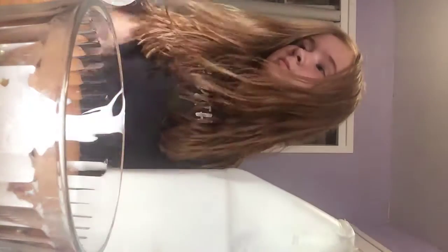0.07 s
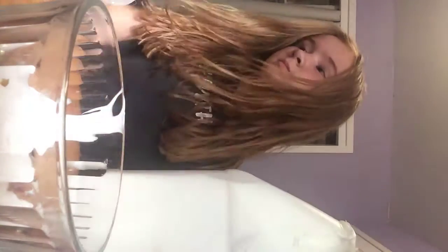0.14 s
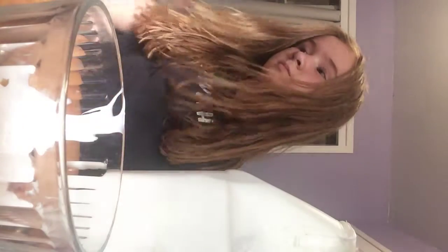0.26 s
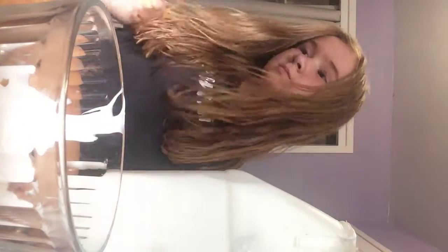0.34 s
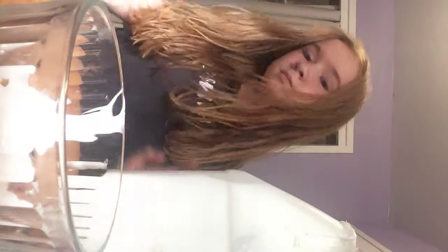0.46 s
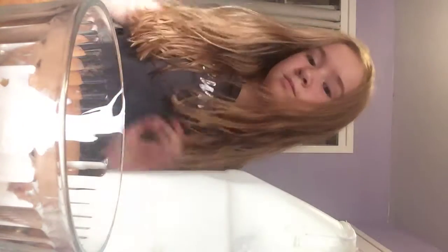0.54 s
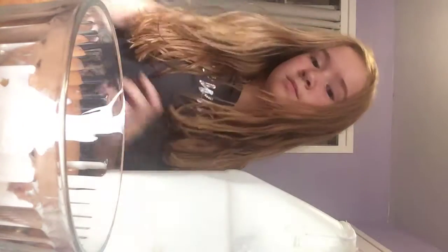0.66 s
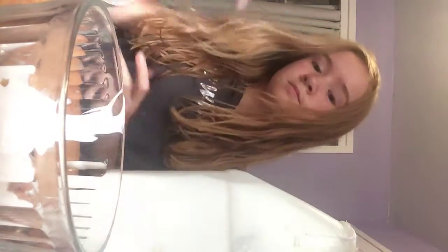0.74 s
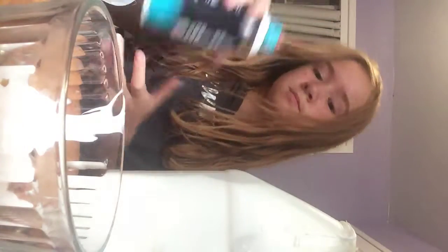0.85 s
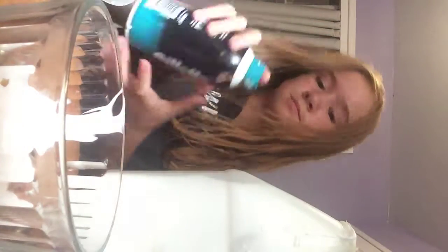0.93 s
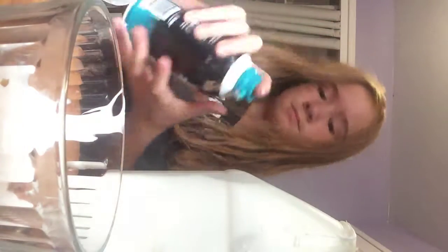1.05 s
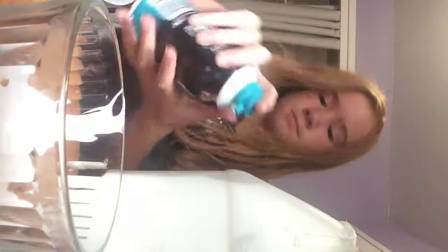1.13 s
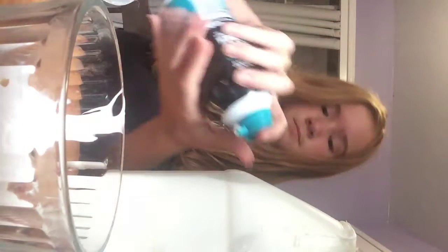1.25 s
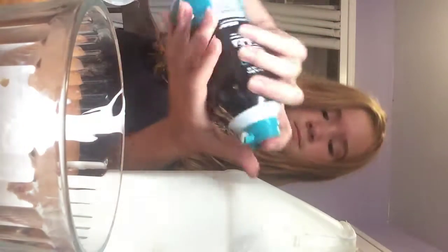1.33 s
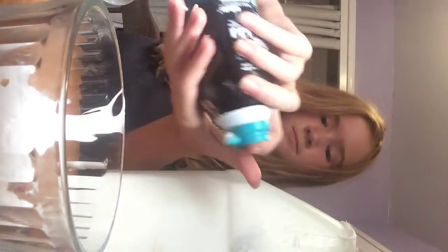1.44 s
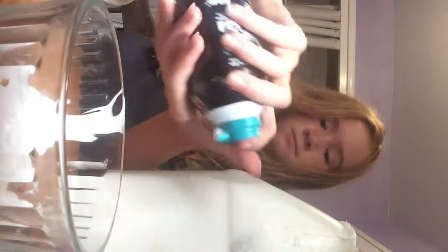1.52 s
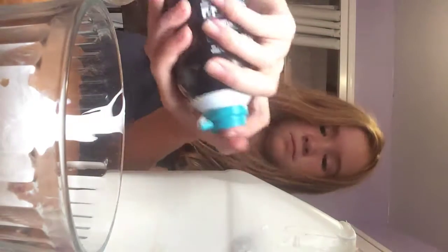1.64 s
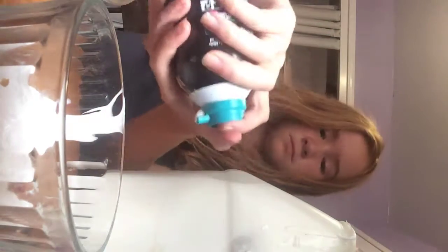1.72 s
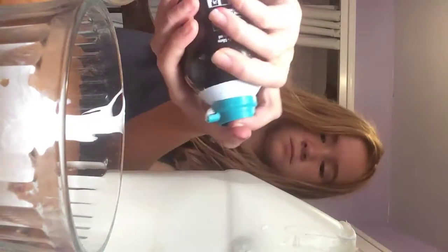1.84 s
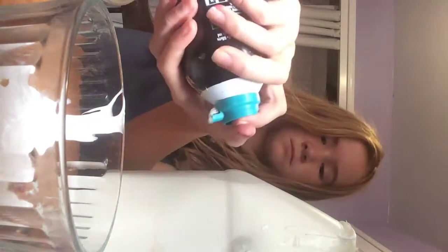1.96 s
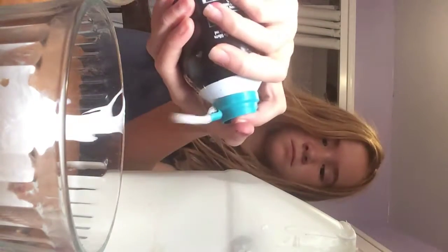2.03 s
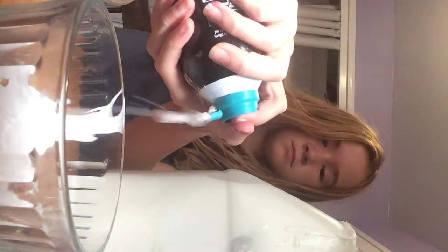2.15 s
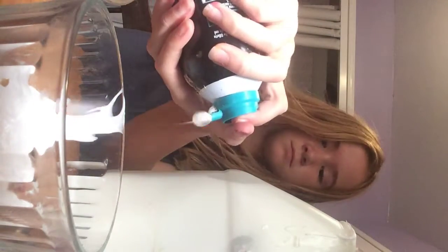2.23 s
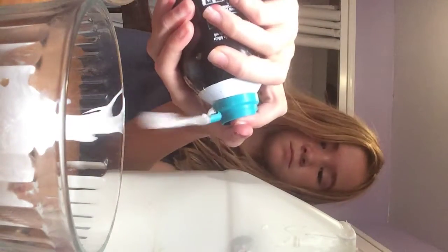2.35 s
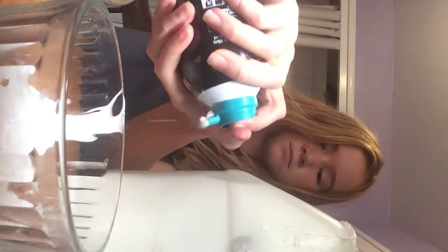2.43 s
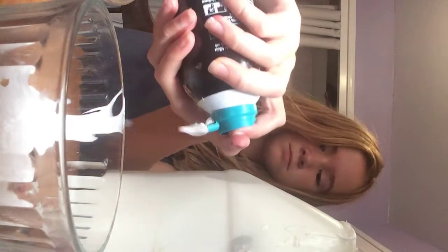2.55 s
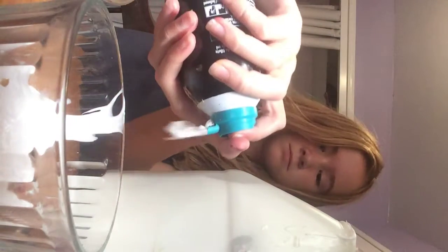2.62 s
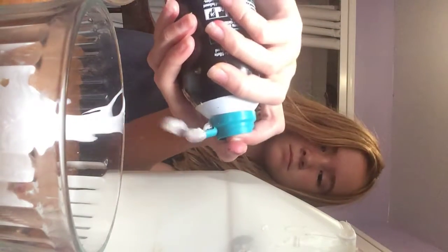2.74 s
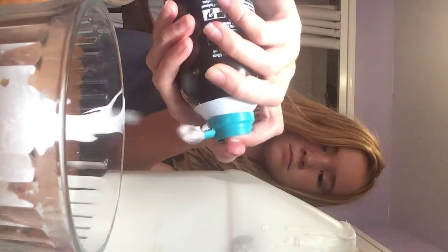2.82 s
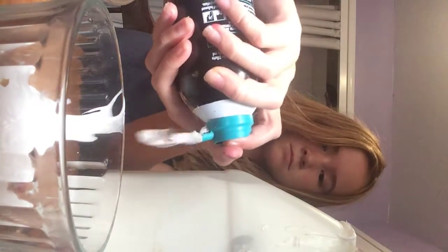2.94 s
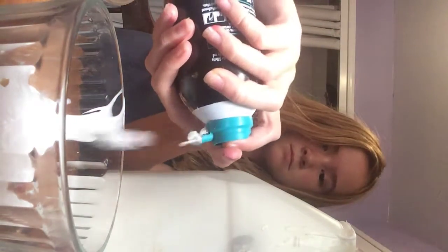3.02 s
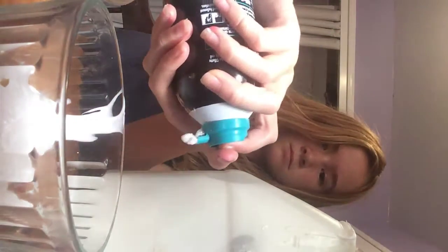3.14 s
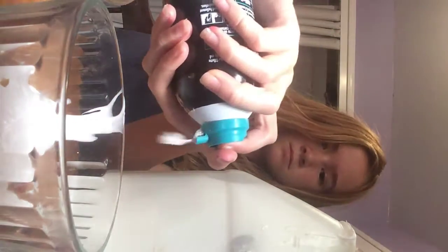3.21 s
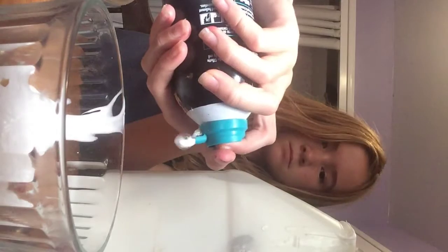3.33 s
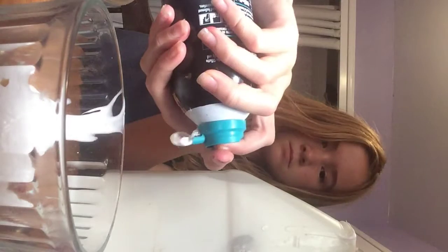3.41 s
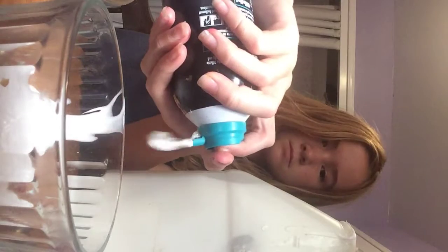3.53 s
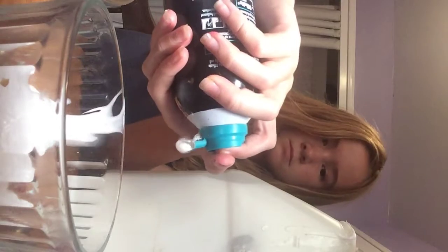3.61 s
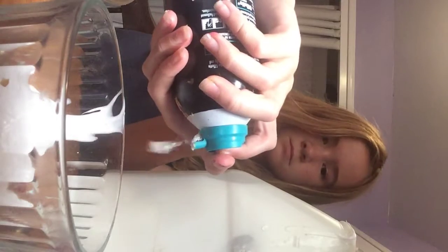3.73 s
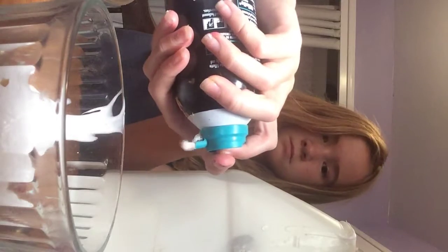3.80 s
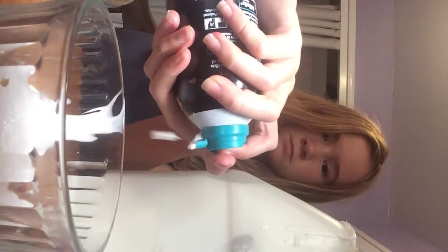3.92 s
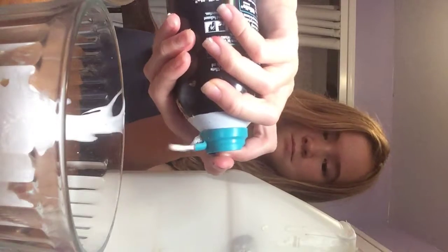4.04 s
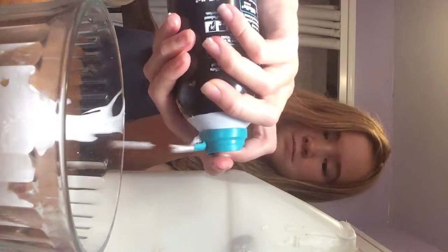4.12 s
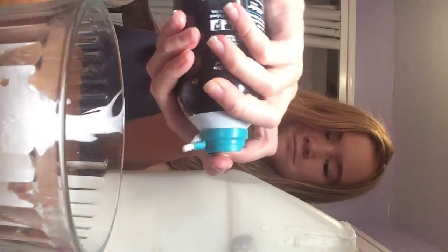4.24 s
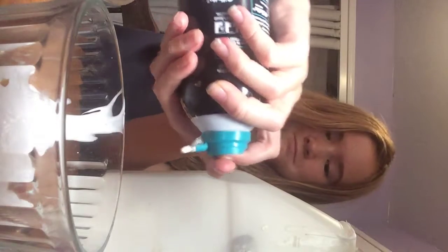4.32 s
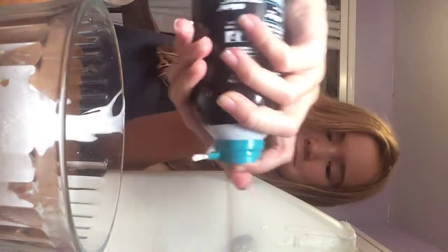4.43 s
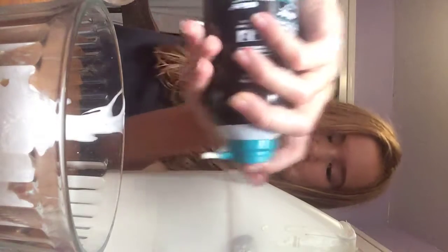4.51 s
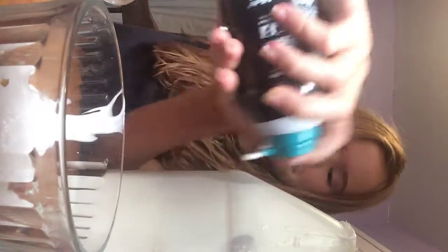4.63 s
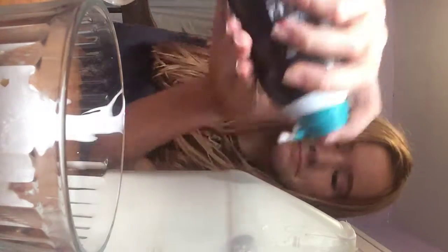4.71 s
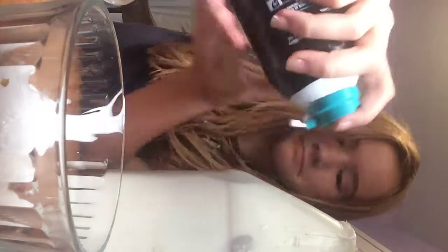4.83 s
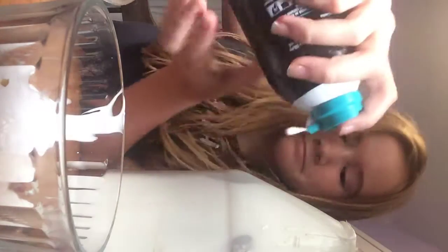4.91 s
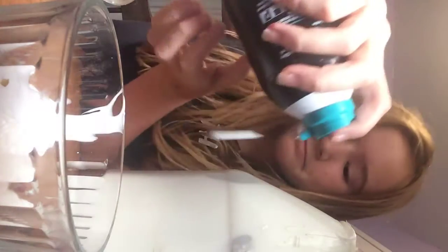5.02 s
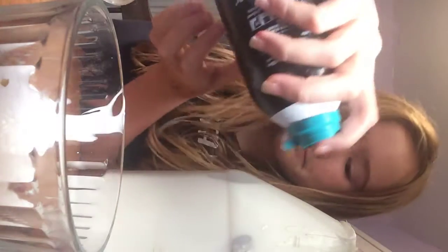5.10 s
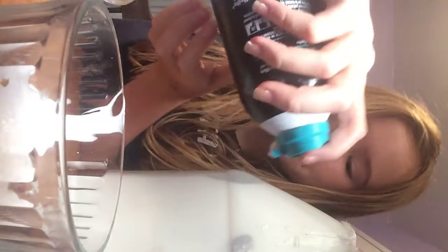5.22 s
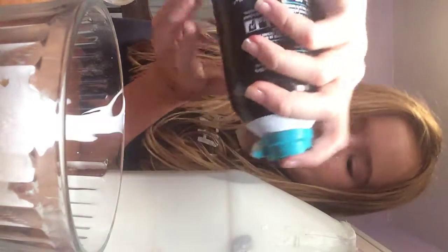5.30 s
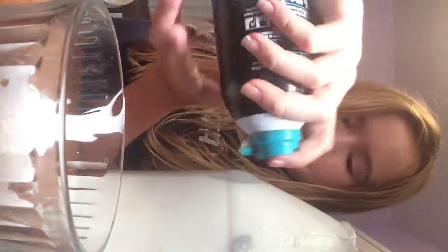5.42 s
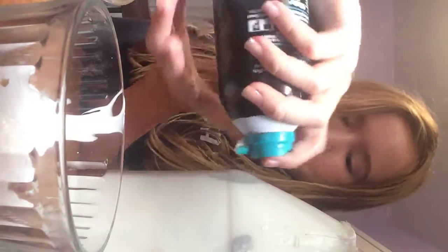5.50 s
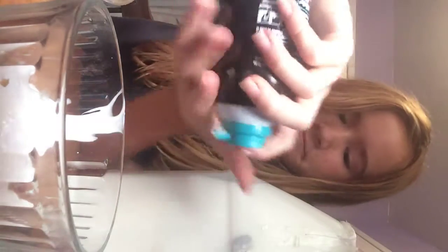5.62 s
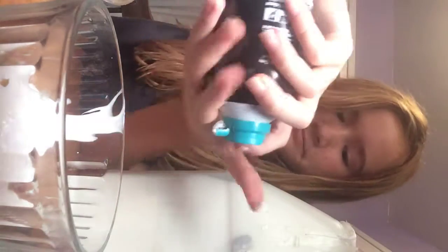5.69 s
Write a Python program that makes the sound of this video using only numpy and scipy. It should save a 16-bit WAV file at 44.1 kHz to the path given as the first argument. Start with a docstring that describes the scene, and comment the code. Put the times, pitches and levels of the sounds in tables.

```python
"""A can of foam spits gas and foam in quick spurts that ring the nozzle and a glass bowl on a table.
It is knocked and gripped before, during and after them; gas leaks just before the foam. A phone is close by.
Spurts and leak are noise through resonances; knocks are decaying tones and short noise clatters.
Behind them the small quiet room hums low and rustles softly (shaped noise); a faint tone and
thin whistles are sines that come and go.
"""
import sys
import numpy as np
from scipy import signal
from scipy.fft import rfft, irfft, next_fast_len
from scipy.io import wavfile
from scipy.ndimage import uniform_filter1d, map_coordinates

SR = 44100
rng = np.random.default_rng(int(sys.argv[2]) if len(sys.argv) > 2 else 0)


def store_wav(level_fs):
    """Save 16-bit WAV to argv[1]."""
    pcm = np.round(np.clip(np.atleast_2d(level_fs), -1, 1) * 32767)
    wavfile.write(sys.argv[1], SR, pcm.T.astype(np.int16))


N = 254016

# spurts from the nozzle: (time [s], length [ms], strength [dB], dry hiss over the strength [dB])
SPURT_ROWS = [(1.994, 2.9, -37, -0.5), (2.143, 6.8, -50, -19.5), (2.16, 18.6, -34.5, -13.5),
              (2.204, 5.9, -36.5, -25), (2.219, 3.7, -30.5, -16.5), (2.229, 25, -27, -11.5),
              (2.253, 8.9, -37.5, 0.5), (2.27, 25, -31, -5.5), (2.318, 23, -27.5, -23.5),
              (2.367, 14, -27.5, -18.5), (2.405, 3.7, -32.5, -19.5), (2.428, 9.6, -27, -20.5),
              (2.445, 2.4, -24, -16), (2.463, 17, -28.5, -4.5), (2.534, 15, -31, -30),
              (2.565, 20, -30, -3.5), (2.623, 8.8, -42, -18), (2.636, 7.6, -22, -27.5),
              (2.687, 8.3, -27.5, -25.5), (2.724, 29, -28.5, -9.5), (2.787, 15.3, -26, -5.5),
              (2.844, 4.4, -26.5, -18), (2.849, 11.6, -27, -13.5), (2.899, 22.5, -26, -8.5),
              (2.956, 26.6, -27, -8), (3.025, 4, -26, -20.5), (3.036, 7.1, -25.5, -21),
              (3.079, 4, -26.5, -24.5), (3.114, 11.8, -27, -10), (3.152, 24.4, -33, -8),
              (3.18, 2.5, -31, -18.5), (3.209, 19.6, -28.5, -17.5), (3.285, 12, -28.5, -7.5),
              (3.347, 21, -29, -6.5), (3.392, 8.4, -41, -11), (3.43, 22, -29, -10.5), (3.49, 6.9, -25, -11),
              (3.556, 11.7, -30, -24.5), (3.568, 14.7, -24.5, -27), (3.624, 23.7, -33, -13),
              (3.684, 21, -34, -11), (3.691, 16.5, -30, -5.5), (3.755, 6.1, -23.5, -9.5),
              (3.79, 16.7, -32.5, -7), (3.809, 5.4, -38.5, -2), (3.913, 16, -28.5, -7),
              (3.974, 20.3, -29.5, -4.5), (4.009, 3.9, -28.5, -6), (4.044, 25.7, -31.5, -8),
              (4.134, 9.1, -30, -11.5), (4.209, 18, -30.5, -10), (4.288, 17.5, -28.5, -9.5),
              (4.349, 21, -29, -11), (4.425, 21, -34, -14)]


def amp(db):
    """Decibels to gain."""
    return 10 ** (np.asarray(db) / 20)


def unit(x):
    """Scaled to rms 1."""
    return x / np.sqrt(np.mean(x ** 2) + 1e-20)


def along(points, hz):
    """Values of (frequency, value) points, interpolated on a log frequency axis."""
    f, v = np.transpose(points)
    return np.interp(np.log(hz + 1), np.log(f + 1), v)


def curves(rows):
    """One value per sample for each column after the time."""
    s, *cols = np.transpose(rows)
    return [np.interp(np.arange(N) / SR, s, c) for c in cols]


def wobble(rate):
    """A smooth random curve through normal random knots, rate knots a second."""
    knots = rng.standard_normal(int(N * rate / SR) + 4)
    return map_coordinates(knots, [np.arange(N) * rate / SR])


def filtered(x, response):
    """x times a complex response of frequency."""
    m = next_fast_len(N + SR // 2)
    return irfft(rfft(x, m) * response(np.fft.rfftfreq(m, 1 / SR)), m)[..., :N]


def noise(spectrum):
    """Coloured noise of rms 1."""
    return unit(filtered(rng.standard_normal(N), lambda hz: amp(along(spectrum, hz))))


def ringing(modes, low_hz, high_hz):
    """Response of parallel resonances of alternating sign inside a steep band, noise gain 1."""
    def response(f):
        peaks = sum((-1) ** k * amp(db) * 1j * f * width / (hz * hz - f * f + 1j * f * width)
                    for k, (hz, width, db) in enumerate(modes))
        high_pass = (1j * f / (low_hz + 1j * f)) ** 4
        shape = peaks * high_pass / (1 + (f / high_hz) ** 8)
        return shape / np.sqrt(np.mean(abs(shape) ** 2))
    return response


def room_hum():
    """Low bass noise: the dying tail of an opening thud, then a quiet room hum that drifts."""
    # (time [s], level [dB])
    hum_level = [(0, -40), (.1, -52.5), (.3, -56.5), (1.7, -59.5), (2.3, -54.5), (2.9, -52.5), (4.5, -54.5),
                 (5.76, -58)]
    # spectrum of the low noise: (frequency [Hz], relative density [dB per Hz])
    air_spectrum = [(15, -51.5), (25, -12), (134, -6.5), (253, -15), (285, -17.5), (316, -25.5),
                    (381, -17.5), (637, -32.5), (782, -47), (1500, -57.5), (1950, -70.5), (3300, -120)]
    return amp(curves(hum_level)[0] + 3.0 * wobble(12)) * noise(air_spectrum)


def rustles():
    """Friction of hands and cloth, and the first foam creeping into the nozzle, as swells of soft noise."""
    # swells: (start [s], hold [s], level [dB])
    swells = [(-.05, 0.11, -65.5), (0.164, 0.071, -65.5), (1.182, 0.049, -61), (2.155, 0.012, -52),
              (4.491, 0.084, -77), (5.615, .02, -69)]
    # (frequency [Hz], relative density [dB per Hz])
    cloth_spectrum = [(290, -10), (500, -15), (800, -4), (1020, -9), (15000, -27)]
    floor_db, rise_db_per_s, fall_db_per_s = -75.5, 226, 151
    t = np.arange(N) / SR
    swell = amp(floor_db)
    for s, hold, db in swells:
        before_db = rise_db_per_s * np.maximum(s - t, 0)
        after_db = fall_db_per_s * np.maximum(t - s - hold, 0)
        swell = swell + amp(db - before_db - after_db)
    return swell * amp(0.88 * wobble(22)) * noise(cloth_spectrum)


def knocks():
    """Each contact thuds the table, sounds a hollow, clicks the can's shell, clatters and rattles briefly."""
    # knocks and finger contacts: (time [s], strength [dB], hollow frequency [Hz],
    # shell click over the strength [dB], clatter over the strength [dB])
    contacts = [(.002, -34.5, 223, -9, -11), (0.161, -39.5, 266, -16, -19), (.309, -54, 707, -14, -5.5),
                (1.122, -50, 850, -13, -30), (1.1341, -16, 750, -13, -35.5), (1.2115, -30.5, 735, 8, -2),
                (1.333, -54.5, 2120, -15, -6), (1.677, -41, 2200, -10, -5.5), (1.693, -57, 1290, -7, 11.5),
                (2.069, -54, 754, -37, -13), (2.284, -36.5, 240, -27, -19), (4.436, -45.5, 430, 10.5, -22),
                (4.565, -57, 2450, -20, -5), (4.846, -23.5, 446, -1, -13), (5.128, -40, 431, -5, -22),
                (5.206, -60, 2480, -10, 3), (5.221, -72.5, 835, -5, 14), (5.31, -53.5, 488, -5, -19),
                (5.751, -30.5, 422, -15.5, -36)]
    # resonances of table and of shell: (frequency [Hz], level [dB], t60 [s])
    table_modes = [(65.5, -1, 0.56), (126, 17, 0.12), (175, 6, 0.088)]
    shell_modes = [(820, 1.5, 0.03), (1093, 3.5, 0.011), (2272, 4.5, 0.0098), (2450, -15, 0.015),
                   (3790, -28, 0.016)]
    # spectra of clatter and of after-rattle: (frequency [Hz], relative density [dB per Hz])
    clatter_spectrum = [(400, -28.5), (1000, -3), (2500, 3), (6000, -2.5), (10000, -17), (16000, -30.5)]
    dull_spectrum = [(150, -23), (350, 9), (2500, -13), (4500, -51)]
    # table thud under the hollow: less for higher contacts, more for harder clicks
    thud_base_db, thud_db_per_octave, thud_hz, thud_per_click = -14.5, -4.5, 428, 0.39
    out, bright, dull = np.zeros(N + SR), np.zeros(N + SR), np.zeros(N + SR)
    t = np.arange(SR // 3) / SR

    def ring(hz, db, t60):
        """A decaying tone."""
        return amp(db - 60 * t / t60) * np.sin(2 * np.pi * hz * t)

    for s, hollow_db, hollow_hz, click_db, tick_db in contacts:
        octaves = np.log2(hollow_hz / thud_hz)
        thud_db = hollow_db + thud_base_db + thud_per_click * click_db + thud_db_per_octave * octaves
        thud = sum(ring(*mode) for mode in table_modes) * (1 - np.exp(-t / 0.00049)) ** 2
        contact = min(.009, 9 / hollow_hz)  # seconds, at most nine cycles
        hollow = np.sin(2 * np.pi * hollow_hz * t) * np.sin(np.pi * np.minimum(t / contact, 1)) ** 2
        # each click strikes the shell a little differently
        click = sum(ring(hz * rng.normal(1, 0.015), db + rng.normal(0, 2), t60)
                    for hz, db, t60 in shell_modes)
        click = click * (1 - np.exp(-t / .001))
        at = slice(round(s * SR), round(s * SR) + len(t))
        out[at] += amp(thud_db) * thud + amp(hollow_db) * hollow + amp(hollow_db + click_db) * click
        # the clatter dies fast, then slowly
        bright[at] += amp(hollow_db + tick_db) * (amp(-60 * t / 0.014) + amp(-17 - 60 * t / 0.16))
        dull[at] += amp(hollow_db - 19.0 - 60 * t / 0.18)
    return out[:N] + bright[:N] * noise(clatter_spectrum) + dull[:N] * noise(dull_spectrum)


def room(x):
    """A noise tail that dies at its own speed for each frequency, new for every quarter second."""
    # (frequency [Hz], t60 [s])
    room_decay = [(150, 0.22), (1000, 0.34), (4000, 0.14), (12000, 0.15)]
    out, step = np.zeros(N + 2 * SR), SR // 4
    for start in range(0, N, step):
        hz, t, z = signal.stft(rng.standard_normal(SR // 2), SR, nperseg=256)
        decay = amp(-60 * t / along(room_decay, hz)[:, None])
        tail = signal.istft(z * decay, SR, nperseg=256)[1]
        wet = signal.fftconvolve(x[start:start + step], tail / np.linalg.norm(tail))
        out[start + 200:][:len(wet)] += wet  # the tail starts 200 samples late
    return out[:N]


def whistles():
    """Faint thin whistles: sines that swell and fade, sharing one unsteady level and phase."""
    # (start [s], length [s], frequency [Hz], level [dB])
    whistle_rows = [(.77, .13, 2660, -82), (.92, .17, 1700, -82), (1.33, .09, 1930, -77),
                    (1.33, .07, 2040, -78), (1.42, .17, 2600, -83), (5.6, .1, 2150, -81)]
    t = np.arange(N) / SR
    waver_db, drift = 3.5 * wobble(60), 1.5 * wobble(60)
    out = np.zeros(N)
    for s, length, hz, db in whistle_rows:
        arch = np.sin(np.pi * np.clip((t - s) / length, 0, 1)) ** .5
        out += amp(db + waver_db) * arch * np.sin(2 * np.pi * hz * t + drift)
    return out


def leak():
    """Thin gas hiss in the nozzle channel; its resonances fall as the channel opens."""
    # gas leak before the foam: (time [s], level [dB])
    leak_level = [(1.845, -91), (1.856, -65), (1.985, -49.5), (1.997, -30.5), (2.008, -47.5), (2.028, -60),
                  (2.045, -65.5), (2.15, -71), (2.17, -88.5)]
    # nozzle channel: (frequency nearly shut [Hz], frequency open [Hz], width [Hz], level [dB])
    channel_modes = [(3100, 2280, 110, -8), (6600, 4750, 320, -3), (6800, 5900, 300, 0),
                     (11000, 6750, 280, 0), (16000, 11000, 280, -5), (20000, 14200, 450, -1)]
    press_s, opens_s = 1.853, .036  # the channel starts to open; its time constant
    level_db, = curves(leak_level)
    opening = 1 - np.exp(-np.maximum(np.arange(N) / SR - press_s, 0) / opens_s)
    out = np.zeros(N)
    for shut_hz, open_hz, width_hz, db in channel_modes:
        phase = 2 * np.pi * np.cumsum(shut_hz + (open_hz - shut_hz) * opening) / SR
        # slow noise on a gliding carrier makes a gliding noise band
        a, b = filtered(rng.standard_normal((2, N)), lambda f: 1 / (1 + 2j * f / width_hz))
        band = unit(a * np.cos(phase) + b * np.sin(phase))
        out += amp(db + 4.1 * wobble(40)) * band
    return amp(level_db) * (level_db > leak_level[0][1]) * unit(out)


def flow(levels_db, lag, closing_t60, opening=0.011):
    """Gas flow of all spurts: a seep, a quick opening, a sag, then foam closes the nozzle."""
    seep_db, sag_by_end_db = -26, -4  # seep before a spurt opens, sag over its length
    out = np.zeros(N + SR)
    t = np.arange(SR // 5) / SR - .025  # seconds from the full opening
    seep = amp(seep_db) * np.clip(1 - t / t[0], 0, 1)
    rise = seep + np.clip(1 + t / opening, 0, 1) ** 2.9
    for (s, ms, *_), db in zip(SPURT_ROWS, levels_db):
        sag_db = sag_by_end_db * np.maximum(t, 0) / (ms / 1000)
        closing_db = -60 * np.maximum(t - ms / 1000, 0) / closing_t60
        out[round((s + t[0] + lag) * SR):][:len(t)] += rise * amp(db + sag_db + closing_db)
    return out[:N]


def spray():
    """Spurts flutter as foam films burst; the low sounds lead each spurt and the hiss follows."""
    # resonances that the gas excites: (frequency [Hz], width [Hz], relative level [dB])
    gurgle_modes = [(844, 219, 0), (981, 136, 3.5), (1076, 280, -8)]
    low_modes = [(1700, 30, -2), (1760, 12, -1.5), (2055, 340, -2.5), (2210, 170, 1.5), (2476, 110, 2.5),
                 (2735, 200, -12)]
    mid_modes = [(3133, 54, 2), (3712, 82, -8.5), (4152, 120, -10)]
    high_modes = [(4870, 31, 9.5), (4964, 45, 0), (5327, 170, 8), (5774, 170, 7), (6030, 270, 10),
                  (7130, 130, -6.5)]
    hiss_modes = [(7740, 290, 6.5), (8930, 160, 4.5), (9760, 600, 0)]
    sizzle_modes = [(10700, 750, 0.5), (13200, 800, -1.5), (16030, 2200, -8)]  # top of the hiss
    # mid ring against low ring: (time [s], level [dB])
    mid_share = [(2.0, -10), (3.5, -1.5), (4.5, 1.5)]
    # foam films that burst: typical rate, scatter, each puff's decay, flow left between puffs
    films_per_s, film_scatter_db, puff_s, between_puffs = 160, 2.5, .0024, .22
    # bursting bubbles in the jet: rate, mean size over the noise rms before each layer's share
    pops_per_s, pop_size = 270, 5.3
    # in spurts stronger than the pivot the low layers lose, and the high ring gains, this many dB per dB
    lean_per_db, pivot_db = 0.25, -31
    shift, shifts_per_s = 0.019, 23  # share by which the resonances wander, and how often

    count = np.cumsum(films_per_s / SR * amp(4 * wobble(90)))
    films = np.diff(np.floor(count), prepend=0) * amp(film_scatter_db * rng.standard_normal(N))
    puffs = signal.lfilter([1], [1, -np.exp(-1 / (puff_s * SR))], films)
    flutter_db = 20 * np.log10(between_puffs + uniform_filter1d(puffs, size=40)) + 1.2 * wobble(600)
    chance = rng.random((2, N))
    pops = pop_size * (chance[0] < pops_per_s / SR) * np.log(chance[1] + 1e-9)

    def jet(own_db, popping=1, flutter=1):
        """Fluttering turbulence with pops, rms 1."""
        return unit(amp(flutter * flutter_db + own_db) * (rng.standard_normal(N) + popping * pops))

    strength_db, dry_db = np.transpose(SPURT_ROWS)[2:]
    lean_db = lean_per_db * (strength_db - pivot_db)
    low_db, hiss_db = strength_db - lean_db, strength_db + dry_db
    gurgle = amp(-18.0) * flow(low_db, lag=-0.004, closing_t60=0.038)
    gurgle *= jet(0.63 * wobble(28), popping=0.9)
    low = flow(low_db - .3, lag=0.0002, closing_t60=0.1) * jet(0.63 * wobble(125))
    mid = amp(curves(mid_share)[0]) * flow(low_db, lag=.0003, closing_t60=0.11)
    mid *= jet(1.3 * wobble(30))
    high = flow(strength_db + lean_db, lag=0.003, closing_t60=.07)
    high *= jet(1.3 * wobble(120), popping=0.47)
    hiss = flow(hiss_db, lag=0.0065, closing_t60=0.03, opening=0.0053)
    hiss *= jet(4.0 * wobble(60), popping=0.24, flutter=.7)
    # a faster jet is also brighter, hence the power
    sizzle = amp(7.5) * flow(hiss_db, lag=.011, closing_t60=.035, opening=.02) ** 1.39
    sizzle *= jet(4 * wobble(45), popping=.2, flutter=0.77)

    # (gas, resonances, band's low edge [Hz], high edge [Hz])
    layers = [(gurgle, gurgle_modes, 600, 1800), (low, low_modes, 1300, 4000),
              (mid, mid_modes, 2500, 5500), (high, high_modes, 4000, 8000),
              (hiss, hiss_modes, 6500, 11500), (sizzle, sizzle_modes, 9500, 19000)]
    out = np.zeros(N)
    for gas, modes, low_hz, high_hz in layers:
        # foam in the nozzle pulls its resonances down or up: a crossfade between two tunings
        turn = np.pi / 4 * (1 + np.tanh(2.6 * wobble(shifts_per_s)))
        for share, factor in (np.cos(turn), 1 - shift), (np.sin(turn), 1 + shift):
            tuned = [(hz * factor, width, db) for hz, width, db in modes]
            out += filtered(share * gas, ringing(tuned, low_hz, high_hz))
    return out


def faint_tone():
    """A faint low sine that drifts in frequency as it comes and goes."""
    # (time [s], frequency [Hz], level [dB])
    tone_rows = [(3.9, 275.5, -65), (4.02, 277.8, -54), (4.19, 285.3, -48), (4.3, 284.6, -56),
                 (4.45, 283, -47.5), (4.58, 284.6, -46), (4.66, 281.5, -62), (4.76, 279.2, -52),
                 (5.18, 277, -63), (5.25, 274.6, -63)]
    t = np.arange(N) / SR
    hz, level_db = curves(tone_rows)
    present = (t > tone_rows[0][0]) * (t < tone_rows[-1][0])
    return amp(level_db) * present * np.sin(2 * np.pi * np.cumsum(hz) / SR)


def scene():
    """Can and knocks close to the microphone, their room tails, and the background of the place."""
    hits = knocks()
    can = leak() + spray()
    tails = room(amp(-10.5) * can + amp(-17.0) * hits)
    background = room_hum() + rustles() + whistles() + faint_tone()
    return (can + hits + tails + background)[None]


def record(dry):
    """The phone adds its own hiss, loses the deepest bass and keeps nothing above its band limit."""
    top_hz, bass_hz = 15900, 40
    self_noise = amp(-76.5) * rng.standard_normal(dry.shape)
    return filtered(dry + self_noise, lambda hz: (hz < top_hz) * (1j * hz / (bass_hz + 1j * hz)) ** 2)


dry = scene()
out = record(dry)
store_wav(out)
```